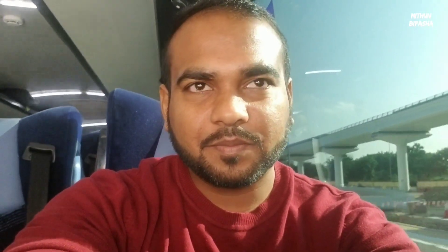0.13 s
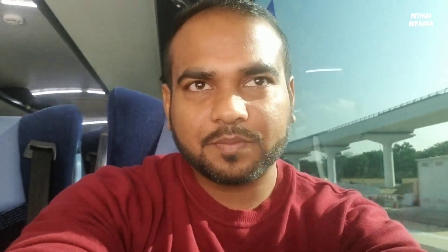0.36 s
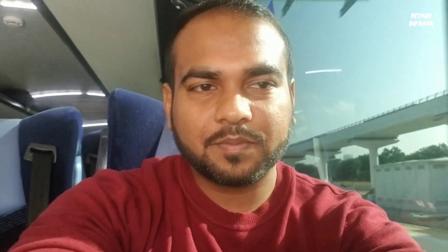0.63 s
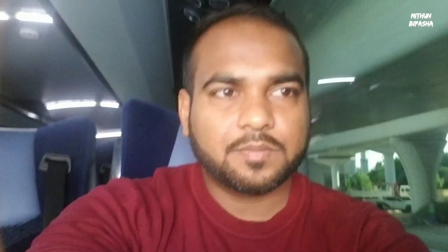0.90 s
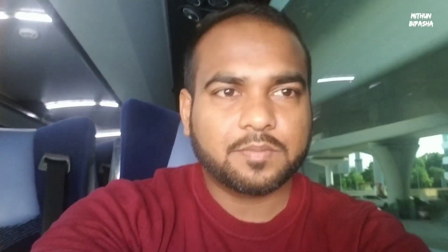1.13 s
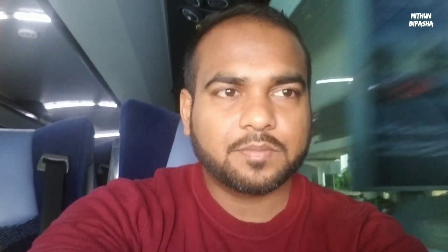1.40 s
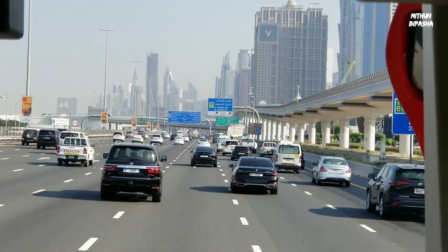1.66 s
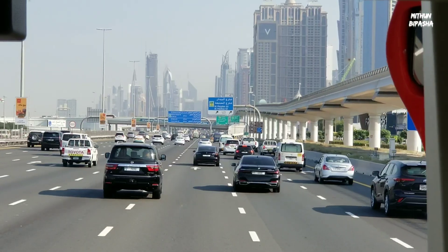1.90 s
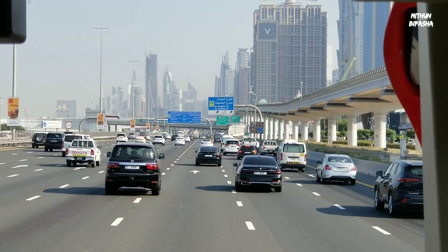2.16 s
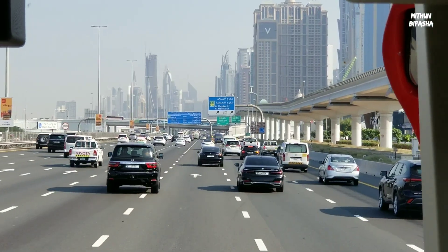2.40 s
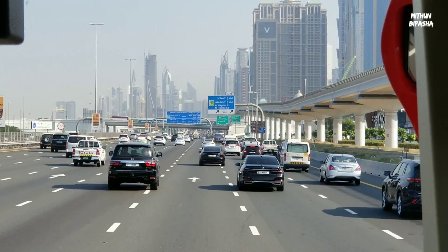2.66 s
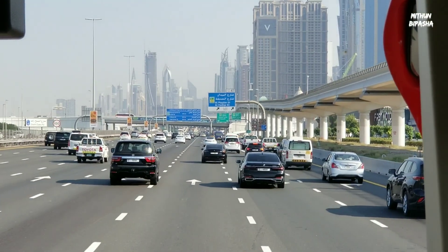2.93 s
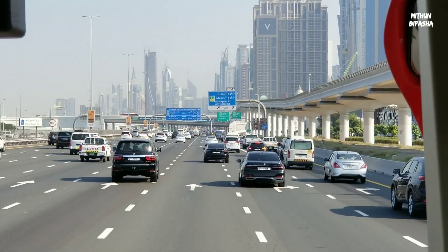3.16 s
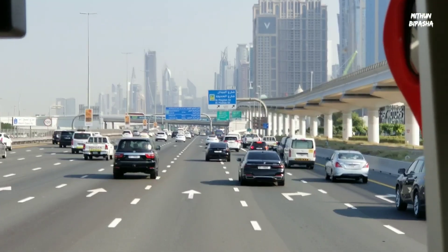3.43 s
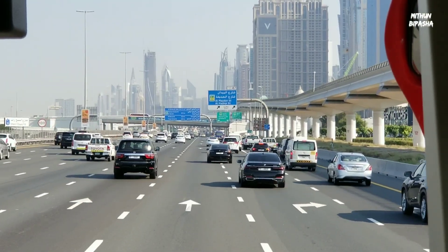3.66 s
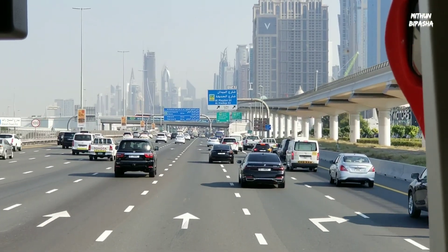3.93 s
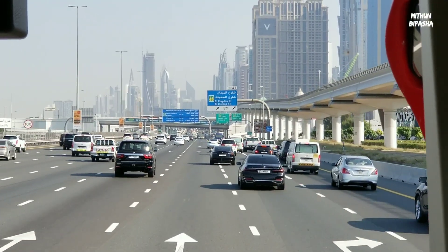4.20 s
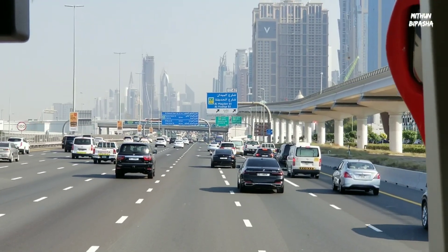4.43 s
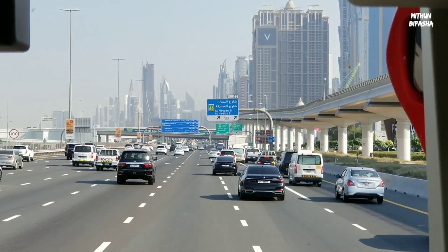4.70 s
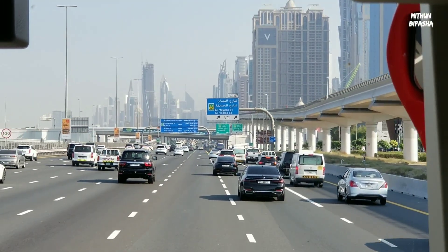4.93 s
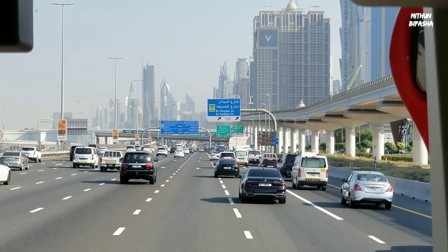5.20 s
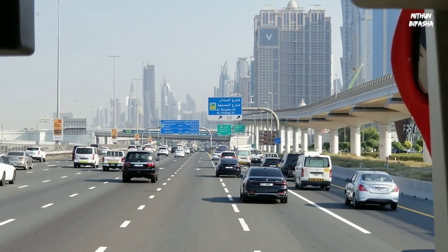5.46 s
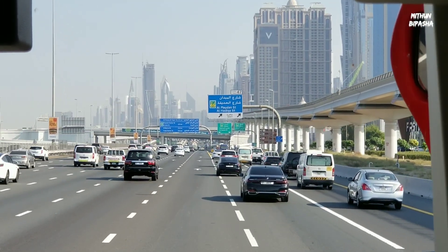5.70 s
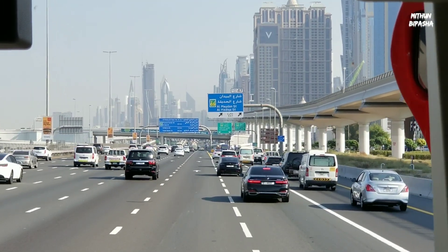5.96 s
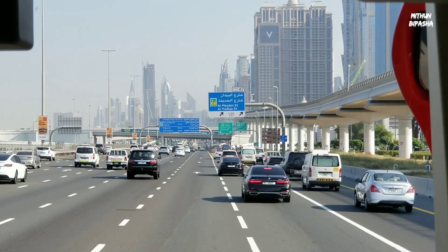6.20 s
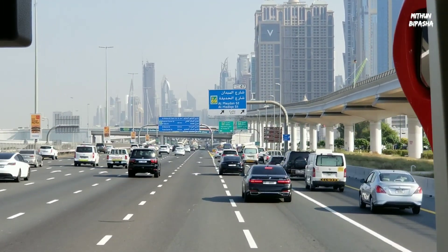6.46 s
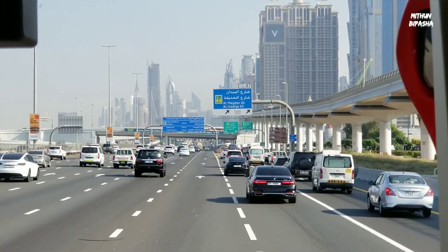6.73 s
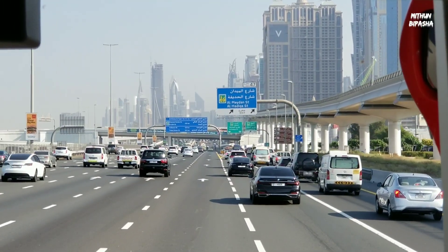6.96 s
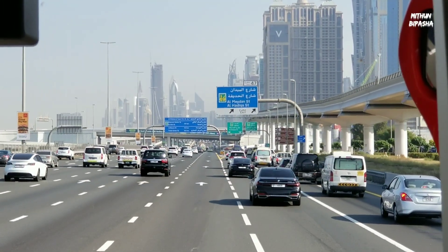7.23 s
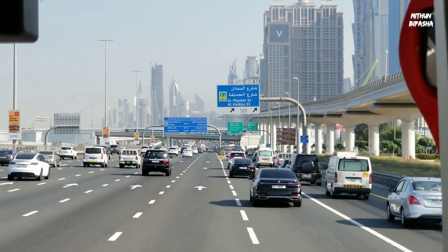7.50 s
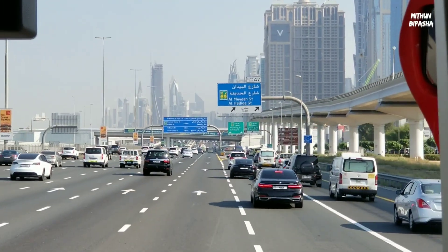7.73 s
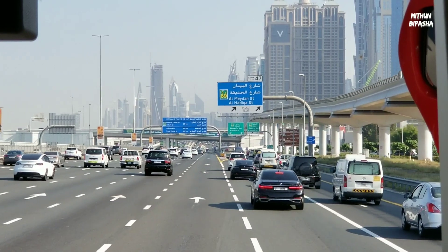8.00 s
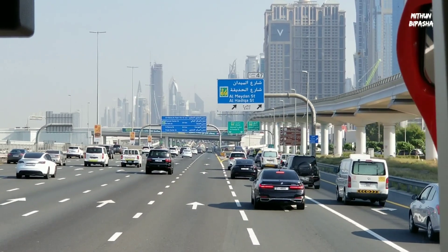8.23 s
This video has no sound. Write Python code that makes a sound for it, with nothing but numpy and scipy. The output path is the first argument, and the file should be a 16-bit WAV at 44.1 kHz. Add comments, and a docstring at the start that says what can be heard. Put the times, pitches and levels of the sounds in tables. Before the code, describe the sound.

Inside a moving highway coach, low tyre rumble and road roar with rattling trim, a brief gap, then a deep engine boom that later fades.

```python
"""Tyre rumble, road roar and air hiss fill a coach on a highway: coloured noise that swells with the road.
At a cabin seat first: a thin electric tone, loose trim rustling (grains of noise) and squeaking (narrow noise).
After a short silence, the front: the six-cylinder engine booms (sines on crankshaft orders) while it pulls and
falls back, a hollow tone hums, road joints ring the floor. Loose parts tick (noise cracks), trim still rustles
and squeaks, and the phone's case is tapped (filtered impulses)."""
import sys
import numpy as np
from scipy import signal
from scipy.fft import rfft, irfft, next_fast_len
from scipy.io import wavfile
from scipy.ndimage import uniform_filter1d, map_coordinates

SR = 44100
rng = np.random.default_rng(int(sys.argv[2]) if len(sys.argv) > 2 else 0)


def wav_out(sig):
    """Save sig, one row per channel (or a flat mono array), as 16-bit PCM at SR to the path in sys.argv[1]."""
    wavfile.write(sys.argv[1], SR, np.round(np.clip(np.atleast_2d(sig).T, -1, 1) * 32767).astype(np.int16))


def natural_amplitude(level_db):
    """Convert a level in decibels to a linear amplitude factor, elementwise."""
    exponent = np.asarray(level_db, float) / 20
    return 10 ** exponent


N = 369103


def unit(x):
    """Scale to rms 1."""
    return x / np.sqrt(np.mean(x ** 2) + 1e-20)


def along(points, hz):
    """Interpolate (Hz, value) points on a log frequency axis."""
    f, v = np.transpose(points)
    return np.interp(np.log(hz + 1), np.log(f + 1), v)


def curves(rows):
    """One value per sample for each column after the time."""
    s, *cols = np.transpose(rows)
    return [np.interp(np.arange(N) / SR, s, c) for c in cols]


def wobble(rate_hz):
    """A smooth random curve, rate_hz knots a second."""
    knots = rng.standard_normal(int(N * rate_hz / SR) + 4)
    return map_coordinates(knots, [np.arange(N) * rate_hz / SR])


def filtered(x, response):
    """Multiply the spectrum of x by a function of frequency."""
    m = next_fast_len(x.shape[-1] + 8192)
    return irfft(rfft(x, m) * response(np.fft.rfftfreq(m, 1 / SR)), m)[..., :x.shape[-1]]


def pan(left_over_right_db):
    """Left and right gains, half of the difference each."""
    return natural_amplitude(left_over_right_db * np.array([[.5], [-.5]]))


def halves(points, hz):
    """A left-right difference along frequency, split evenly between the ports."""
    return np.outer([.5, -.5], along(points, hz))


def port_response(lean, lead):
    """Level and phase differences between the two ports, as a function of frequency."""
    return lambda hz: natural_amplitude(halves(lean, hz)) * np.exp(1j * halves(lead, hz))


def rush(spectrum, alike, lean, lead, patchy_db, body=()):
    """Stereo noise, its port mean at rms 1, in patches of random gain, shaped by body resonances."""
    z = signal.stft(rng.standard_normal((2, N + 512)), nperseg=512)[2]
    field = uniform_filter1d(rng.standard_normal(z.shape[1:]), size=8, axis=0)
    field = uniform_filter1d(field, size=8, axis=1)
    pair = signal.istft(z * natural_amplitude(patchy_db * unit(field)), nperseg=512)[1][:, :N]

    def mid_side(hz):
        lift_db = sum(db / (1 + (2 * (hz - centre) / width) ** 2) for centre, width, db in body)
        turn = np.arccos(np.clip(along(alike, hz), -1, 1)) / 2
        return natural_amplitude(along(spectrum, hz) + lift_db) * np.array([np.cos(turn), np.sin(turn)])

    mid, side = filtered(pair, mid_side)
    both = filtered(np.array([mid + side, mid - side]), port_response(lean, lead))
    return both / np.sqrt(np.mean(both.mean(0) ** 2))


# Road controls. Each row: time in seconds, swell in dB over the usual level, roughness in dB.
SEAT_ROAD_DB = [(0, -1, 6.5), (.45, -0.5, -1), (.7, -1, -1.5), (1.05, 0, 2), (1.51, 0, -2)]
FRONT_ROAD_DB = [
    (1.58, 5, 1), (1.75, 4.5, -7), (2.05, .5, -2), (2.5, 1, -0.5), (2.9, -0.5, 0.5), (3.5, -1.5, -8),
    (4.2, -1.5, -2.5), (4.6, -1, -2.5), (5.0, -2, -4), (5.45, 1.5, -2), (6.0, 0, -5), (6.4, .5, -2.5),
    (6.85, 1, 1), (7.1, 0, 2), (7.4, 1.5, 1), (7.75, 4.5, 3.5), (8.05, 3.5, 1.5), (8.37, 5, -5)]
# Usual levels. One row: floor rumble in dB, road roar in dB, air hiss in dB.
SEAT_LEVELS_DB = (-30.5, -37.5, -57.5)
FRONT_LEVELS_DB = (-33, -44.5, -62.5)
# Noise spectra. Each row: frequency in Hz, relative density in dB per Hz.
SEAT_RUMBLE_DB = [(13, -42.5), (22, -5.5), (79, 2.5), (95, -1.5), (109, -9), (133, -5), (167, -13),
                  (195, -6), (290, -19), (380, -52.5), (640, -120)]
FRONT_RUMBLE_DB = [(13, -40.5), (22, -3.5), (43, -1.5), (54, -7), (66, -2), (80, 0), (93, -1), (109, -10.5),
                   (141, -9.5), (205, -17), (236, -13), (252, -25), (269, -36), (290, -27), (380, -63.5),
                   (640, -120)]
SEAT_ROAR_DB = [(150, -45), (260, -5), (302, -15), (339, 1), (378, -7), (550, -9.5), (598, -4.5),
                (688, -2.5), (820, -14), (914, -7), (1000, -12.5), (1240, -10.5), (1490, -20.5),
                (1900, -26), (2470, -38), (4180, -120)]
FRONT_ROAR_DB = [(150, -32), (260, -3.5), (269, -16.5), (348, -5.5), (388, -11), (454, -8), (527, -10.5),
                 (541, -18), (565, -6), (640, -9.5), (675, -5.5), (700, -9), (767, -12.5), (914, -14),
                 (976, -17), (1100, -13.5), (1480, -21.5), (1900, -26.5), (2470, -55), (4180, -120)]
SEAT_HISS_DB = [(880, -34), (1500, -5.5), (2650, -8), (2870, -10.5), (4130, -15.5), (4740, -22.5),
                (6950, -31), (7820, -28), (8370, -39.5), (9700, -35.5), (15700, -42)]
FRONT_HISS_DB = [(880, -31), (1500, -3.5), (2360, -5.5), (2760, -7.5), (3460, -12.5), (3850, -11.5),
                 (4640, -19), (6170, -28), (8210, -44), (10600, -36.5), (15700, -40.5)]
# Narrow body resonances in rumble and roar. Each row: centre in Hz, width in Hz, lift in dB.
SEAT_BODY_HZ_DB = [(84, 8.4, 3), (140.6, 5.1, 3.5), (193, 3.8, 3.5), (345, 29, 1), (613, 22, 4.5),
                   (673, 14, 4), (712, 20, 3), (954, 40, -3)]
FRONT_BODY_HZ_DB = [(354, 39, 2.6), (898, 32, 7.1), (1114, 100, 2.6), (610, 11, 4.5), (622, 11, 5.5)]
# Left-right likeness. Each row: frequency in Hz, likeness from 0 to 1.
SEAT_ALIKE = [(60, .99), (210, .96), (345, .92), (510, .35), (700, .65), (820, .15), (925, .7), (1230, .05),
              (1500, .2), (2000, .05)]
FRONT_ALIKE = [(60, .997), (150, .99), (215, .96), (300, .75), (450, .52), (620, .92), (800, .55),
               (1000, .12), (1500, .45), (1950, .05)]
# Level lean. Each row: frequency in Hz, left over right in dB.
SEAT_LEAN_DB = [(60, 1.4), (200, 1), (1300, 1), (2400, 3), (8000, 2.5)]
FRONT_LEAN_DB = [(60, 1.3), (200, 1), (380, 1.5), (650, 4.5), (1300, 4), (2400, 3.2), (4400, 1.5),
                 (8100, -3), (15000, -1.5)]
# Phase lead. Each row: frequency in Hz, lead of left over right in radians.
SEAT_LEAD_RAD = [(60, .13), (150, .06), (430, .1), (620, -.6), (930, -.5), (1400, -2.6)]
FRONT_LEAD_RAD = [(60, .09), (150, .03), (280, -.05), (430, .06), (620, .3), (820, .25), (1000, 1.5),
                  (1400, 3.0)]
RUMBLE_FOLLOWS, HISS_FOLLOWS, HISS_FEELS_ROUGH = 0.32, 1.05, 0.056  # dB per dB of the controls


def road(controls, levels_db, rumble, roar, hiss, body, *ports):
    """Tyre rumble in the floor, roar in the panels, air at the glass; bumps shake roar and hiss together."""
    swell_db, rough_db = curves(controls)
    rumble_db, roar_db, hiss_db = levels_db
    bumps = wobble(11)

    floor = rush(rumble, *ports, patchy_db=0.7, body=body)
    deep = filtered(floor, lambda hz: 1 / (1 + (hz / 98) ** 12))  # deepest modes answer rough road
    upper = floor - deep
    floor = (upper + natural_amplitude(rough_db) * deep) / np.std(upper.mean(0))
    low = natural_amplitude(rumble_db + RUMBLE_FOLLOWS * swell_db + 0.22 * wobble(5.7)) * floor

    panels = rush(roar, *ports, patchy_db=1.03, body=body)
    middle = natural_amplitude(roar_db + swell_db + 0.36 * bumps) * panels

    air = rush(hiss, *ports, patchy_db=0.87)
    air_db = hiss_db + HISS_FOLLOWS * swell_db + HISS_FEELS_ROUGH * rough_db
    high = natural_amplitude(air_db + 0.85 * bumps + 1.4 * wobble(75)) * air
    return low + middle + high


WHINE_HZ = 7720
# Electric tone, strongest at the seat. Each row: time in seconds, level in dB.
WHINE_DB = [(0, -82), (1.1, -88), (1.4, -78), (1.6, -88.5), (2.2, -103), (8.37, -105)]


def whine():
    """A thin electric tone: a fixed-pitch sine whose level wavers."""
    db, = curves(WHINE_DB)
    tone = np.sqrt(2) * np.sin(2 * np.pi * WHINE_HZ * np.arange(N) / SR)
    return natural_amplitude(db + 2.5 * wobble(9)) * tone * pan(3)


# Shivers of loose trim. Each row: start in seconds, length in seconds, high band level in dB,
# low band over high in dB, left over right in dB.
RUSTLE_S_DB = [(0.041, 0.035, -71.5, -5, 5.5), (0.124, 0.044, -66.5, -1, 2.5),
               (0.181, 0.12, -63.5, -2, 2.5), (0.287, .04, -64.5, -1, 1.5), (0.34, .05, -61.5, -4, 2),
               (0.411, 0.072, -68, 2, 1), (0.626, 0.13, -82, 11, -1.5), (1.431, 0.084, -71.5, 3, 1.5),
               (1.576, .1, -66.5, -1.5, -1), (1.699, .08, -81.5, -1, -4), (1.949, 0.17, -81.5, -3, -11.5),
               (2.335, .04, -88, 3.5, 2), (3.363, 0.044, -81.5, 3, -7), (3.429, 0.08, -71.5, -4.5, -6.5),
               (3.54, .1, -83, 1.5, -6), (3.755, 0.018, -79.5, 0, 0), (3.937, 0.025, -73, -10.5, -4.5),
               (4.565, 0.041, -80, -5, -2.5), (4.899, 0.018, -80.5, 0, -4.5),
               (5.046, 0.085, -80.5, 4.5, -7), (5.255, 0.089, -78.5, 6, -4), (5.337, .07, -71, -3, -3),
               (5.456, 0.088, -74.5, 3, -5), (5.592, .2, -80.5, 5.5, -3.5), (5.895, .09, -74, -10, -4.5),
               (5.993, 0.081, -71.5, -6, -2), (6.112, 0.098, -85, 2, -3), (6.27, 0.018, -87.5, 13.5, -4),
               (7.31, .08, -78, -1, -6), (7.389, .1, -76.5, 3, -7), (7.524, 0.037, -73, 3, -11),
               (7.579, .04, -77, -3, -6.5), (7.632, 0.026, -71.5, -3, -5.5), (7.737, .06, -79.5, 11, -8),
               (7.81, 0.056, -68, 0, -9.5), (7.947, 0.092, -67.5, -3, -8), (8.106, .04, -68.5, 1, -10),
               (8.151, 0.046, -68, -4, -4), (8.222, 0.094, -83.5, 3, -5)]
# Band spectra. Each row: frequency in Hz, relative density in dB per Hz.
RUSTLE_HIGH_DB = [(5180, -39.5), (8800, -8.5), (9830, 1), (10800, 3.5), (11900, -2), (13100, -2.5),
                  (13700, -11), (14900, -8), (15600, -14.5)]
RUSTLE_LOW_DB = [(4000, -29), (4800, -4.5), (5500, -2), (6050, -4.5), (6600, -8), (7400, -29), (9000, -120)]
SHIVER_RISE_S, SHIVER_T60_S = 0.0098, 0.28


def rustle():
    """Loose trim shivers: uneven noise grains in two bands; each shiver rises fast, holds, dies away."""
    t, power = np.arange(N) / SR, np.zeros((2, 2, N))  # band, port, sample
    for s, length, db, low_db, pan_db in RUSTLE_S_DB:
        span = slice(round(s * SR), round((s + length + .4) * SR))
        u = t[span] - s
        rise = np.clip(u / SHIVER_RISE_S, 0, 1)
        decay = natural_amplitude(-60 * np.clip(u - length, 0, None) / SHIVER_T60_S)
        band_port_db = db + np.add.outer([0, low_db], [pan_db / 2, -pan_db / 2])
        power[..., span] += (natural_amplitude(band_port_db)[..., None] * rise * decay) ** 2
    grains = natural_amplitude(1.0 * wobble(32) + 2.3 * wobble(55) + 1.8 * wobble(160))
    flat = [(1000, 0.0017)]  # ports nearly independent, level and phase nearly equal
    high = unit(grains * rush(RUSTLE_HIGH_DB, flat, flat, flat, patchy_db=3.5))
    low = unit(grains * rush(RUSTLE_LOW_DB, flat, flat, flat, patchy_db=2.5))
    return np.sqrt(power[0]) * high + np.sqrt(power[1]) * low


# Squeaks. Each row: start in seconds, relative level in dB, pitch in Hz, length in seconds,
# left over right in dB.
SQUEAKS_S_DB_HZ = [(0.05, -75, 10300, 0.027, 2), (0.12, -74, 10700, .03, 0), (0.179, -72, 10600, .03, 6),
                   (0.28, -66, 13000, 0.044, 2), (0.226, -71, 12800, .03, 2), (0.353, -66, 12900, .03, 2),
                   (0.352, -65, 6100, 0.033, -4), (0.419, -62.5, 6100, 0.031, 1),
                   (0.473, -68.5, 6030, .04, 0), (0.637, -71, 6100, .05, -3.5), (0.754, -75, 6300, .05, 1),
                   (3.56, -76.5, 11200, 0.03, -1), (3.608, -81.5, 11300, .03, -1.5),
                   (3.672, -81, 11200, 0.032, -3), (6.075, -68.5, 11250, 0.03, -9),
                   (6.115, -86, 11200, .05, -9), (7.433, -69, 10650, 0.019, -11), (7.4, -71, 5200, .03, -4),
                   (7.535, -76, 10700, .03, -9), (7.747, -70, 5660, .03, -7), (7.96, -68, 5670, 0.022, -3),
                   (7.966, -65, 5100, .015, -3), (7.837, -72, 10700, 0.034, -7),
                   (7.976, -64, 11040, 0.028, -9), (8.024, -70, 11000, 0.032, -6),
                   (8.27, -85, 11150, 0.034, -9)]


def squeaks():
    """Rubbing plastic slips at once, sings on one narrow, rough pitch and fades."""
    out = np.zeros((2, N + SR))
    for s, db, hz, length, pan_db in SQUEAKS_S_DB_HZ:
        t = np.arange(round(length * SR)) / SR
        noise = rng.standard_normal(len(t))
        tone = unit(filtered(noise, lambda f: 1 / (1 + ((f - hz) / 130) ** 2)))
        rise = np.clip(t / .003, 0, 1)
        fade = natural_amplitude(-12 * t / t[-1]) * np.clip((t[-1] - t) / .004, 0, 1)
        out[:, round(s * SR):][:, :len(t)] += 1.5 * natural_amplitude(db) * pan(pan_db) * rise * fade * tone
    return out[:, :N]


# Engine speed. Each row: time in seconds, firing rate in Hz.
FIRING_HZ = [(1.58, 63.2), (2.1, 63.1), (2.9, 63.9), (3.2, 64.8), (3.7, 65.2), (4.0, 66.1), (4.5, 67.3),
             (5.1, 68.1), (5.9, 68.5), (7.1, 69.5)]
# Boom. Each row: time in seconds, level in dB.
BOOM_DB = [(1.58, -33.5), (1.73, -30.5), (1.78, -20.5), (2.0, -20), (2.4, -20), (2.6, -17), (2.95, -16),
           (3.5, -17.5), (3.9, -15.5), (4.3, -19.5), (4.8, -20), (5.2, -19), (5.34, -16.5), (5.39, -30),
           (5.75, -26.5), (5.9, -38.5)]
# Weaker crankshaft orders, the firing being order 3. Each row: order, relative level in dB.
ORDER_DB = [(1.5, -42), (2, -40.5), (2.5, -46), (3.5, -32), (4, -41), (4.5, -34), (5, -36), (5.5, -43.5),
            (6, -40.5), (8, -49.5), (9, -48.5)]
# weaker orders hold their level until the engine lets go
LET_GO_S, LET_GO_DB_PER_S, HELD_DB = 6.8, 136.5, -3.5


def engine():
    """The firing order booms in the cabin; uneven cylinders add a comb of half and whole orders."""
    t = np.arange(N) / SR
    firing_hz, = curves(FIRING_HZ)
    boom_db, = curves(BOOM_DB)
    crank = 2 * np.pi * np.cumsum(firing_hz / 3) / SR
    fade = np.clip((BOOM_DB[-1][0] - t) / 0.1, 0, 1)
    shiver = .05 * wobble(7.2)
    boom = fade * natural_amplitude(boom_db + .6 * wobble(12)) * np.sin(3 * crank + shiver)

    load_db = HELD_DB - LET_GO_DB_PER_S * np.clip(t - LET_GO_S, 0, None)
    comb = np.zeros(N)
    for order, db in ORDER_DB:
        phase = rng.uniform(0, 2 * np.pi) + 0.6 * wobble(2.6)
        comb += natural_amplitude(db + load_db + 1.0 * wobble(3.6)) * np.sin(order * crank + phase)
    # a cabin mode lifts the order that crosses it
    comb = filtered(comb, lambda hz: natural_amplitude(6 / (1 + ((hz - 97) / 9) ** 2)))
    both = np.sqrt(2) * (boom + comb) * pan(1.3)
    return filtered(both, lambda hz: np.exp(1j * halves(FRONT_LEAD_RAD, hz)))


HUM_HZ, HUM_WAVERS_HZ, HUM_DB = 616, 9, -52


def hum():
    """A hollow tone whose pitch wavers fast; it swells with the road noise."""
    swell_db, _ = curves(FRONT_ROAD_DB)
    phase = 2 * np.pi * np.cumsum(HUM_HZ + HUM_WAVERS_HZ * wobble(14)) / SR
    tone = natural_amplitude(HUM_DB + 0.78 * swell_db + 2.4 * wobble(18)) * np.sqrt(2) * np.sin(phase)
    return filtered(tone, port_response(FRONT_LEAN_DB, FRONT_LEAD_RAD))


# Wheels meeting road joints. Each row: start in seconds, peak in dB.
JOLTS_S_DB = [(1.781, -14), (1.877, -12.5), (7.666, -15), (7.783, -16), (7.917, -17.5), (8.079, -15.5)]
JOLT_HZ, JOLT_RISE_S, JOLT_T60_S = 76, .01, .11


def jolts():
    """Each joint shakes the floor, which rings for a few cycles."""
    out, t = np.zeros(N + SR), np.arange(SR // 2) / SR
    envelope = (1 - np.exp(-t / JOLT_RISE_S)) * natural_amplitude(-60 * t / JOLT_T60_S)
    ring = envelope * np.sin(2 * np.pi * JOLT_HZ * t)
    for s, db in JOLTS_S_DB:
        out[round(s * SR):][:len(t)] -= natural_amplitude(db) * ring / ring.max()
    return out[:N] * pan(1.3)


# Sharp ticks. Each row: start in seconds, relative level in dB, T60 in seconds, left over right in dB,
# brightness in dB per octave.
TICKS_S_DB = [(2.345, -52, .07, 1, 1), (3.565, -52, .05, 0, 0), (3.7624, -53, .04, 3, 3),
              (4.9075, -45, .06, 5, -4.5), (5.0578, -47, .09, 4, -3), (5.1885, -47, .08, 2, 0),
              (5.1945, -36, .08, -2.5, 1.5), (5.2045, -40.5, .08, -1, 2), (5.2125, -45, .05, -1, 1.5),
              (5.229, -47, .11, 1, 0), (7.9503, -49, .06, .5, 0), (2.6754, -50, .015, 0, 1),
              (6.76, -59, .02, 0, 5)]
# Tick spectrum. Each row: frequency in Hz, relative density in dB per Hz.
TICK_COLOUR_DB = [(880, -27.5), (1500, -1.5), (2450, -2), (3300, -7), (4200, 0.5), (5150, -0.5),
                  (5600, -7.5), (6610, -6), (8210, -31), (11100, -11), (13000, -19), (15700, -23)]


def ticks():
    """A loose part strikes: a sudden broad crack with a short cabin tail."""
    out, t = np.zeros((2, N + SR)), np.arange(SR // 4) / SR
    for s, db, t60, pan_db, tilt_db in TICKS_S_DB:
        def colour(hz):
            bright_db = tilt_db * np.log2(np.maximum(hz, 1500) / 4500)
            return natural_amplitude(along(TICK_COLOUR_DB, hz) + bright_db - 40 * (hz < 880))

        shared, left, right = rng.standard_normal((3, len(t)))  # direct sound reaches both ports alike
        crack = unit(filtered(shared + 1.5 * np.array([left, right]), colour))
        stroke = (1 - np.exp(-t / .0005)) * natural_amplitude(-60 * t / t60)
        out[:, round(s * SR):][:, :len(t)] += natural_amplitude(db - 6.0) * pan(pan_db) * stroke * crack
    return out[:, :N]


# Dull taps on the phone's case, next to the left port. Each row: start in seconds, left peak in dB.
TAPS_S_DB = [(2.3505, -44), (2.3852, -38), (6.5229, -35.5), (7.5237, -38.5), (7.7245, -42), (7.792, -38.5),
             (7.9776, -36.5)]
TAP_LOW_HZ, TAP_HIGH_HZ, TAP_RIGHT_DB = 1000, 4200, -14


def taps():
    """One soft blow each, with neither bass nor treble, far louder in the left port."""
    blows = np.zeros(N)
    for s, db in TAPS_S_DB:
        blows[round(s * SR)] = natural_amplitude(db)
    no_treble = signal.butter(10, TAP_HIGH_HZ, fs=SR, output="sos")
    no_bass = signal.butter(2, TAP_LOW_HZ, "high", fs=SR, output="sos")
    case = np.vstack([no_treble, no_bass])
    peak = np.abs(signal.sosfilt(case, signal.unit_impulse(200))).max()
    return signal.sosfilt(case, blows) / peak * natural_amplitude([[0], [TAP_RIGHT_DB]])


# Silence between the moments. One row: start in seconds, end in seconds.
SILENCE_S = (1.5135, 1.5775)


def scene():
    """The seat until the silence, the front after it."""
    t = np.arange(N) / SR
    seat = road(SEAT_ROAD_DB, SEAT_LEVELS_DB, SEAT_RUMBLE_DB, SEAT_ROAR_DB, SEAT_HISS_DB,
                SEAT_BODY_HZ_DB, SEAT_ALIKE, SEAT_LEAN_DB, SEAT_LEAD_RAD)
    front = road(FRONT_ROAD_DB, FRONT_LEVELS_DB, FRONT_RUMBLE_DB, FRONT_ROAR_DB, FRONT_HISS_DB,
                 FRONT_BODY_HZ_DB, FRONT_ALIKE, FRONT_LEAN_DB, FRONT_LEAD_RAD)
    front = front + engine() + hum() + jolts()
    either = whine() + rustle() + squeaks() + ticks() + taps()
    closing = np.clip((SILENCE_S[0] - t) / .002, 0, 1)
    return (seat + either) * closing + (front + either) * (t >= SILENCE_S[1])


def low_pass(x):
    """Removes everything above the highest recorded frequency."""
    return signal.sosfilt(signal.butter(12, 16380, fs=SR, output="sos"), x)


TOP_HZ = 15750


def record(dry):
    """The phone loses the deepest bass and keeps nothing above its band limit; the silence is kept empty."""
    heard = filtered(dry, lambda hz: (hz < TOP_HZ) / (1 + (30 / (hz + 1)) ** 4))
    t = np.arange(N) / SR
    sounding = (t < SILENCE_S[0]) | (t >= SILENCE_S[1])
    return low_pass(heard * sounding)


dry = scene()
out = record(dry)
wav_out(out)
```